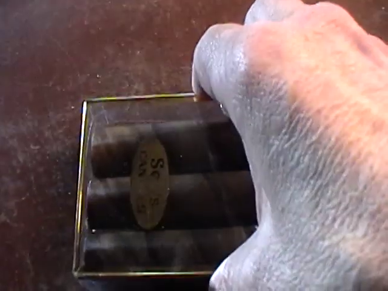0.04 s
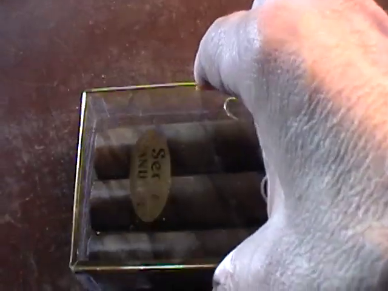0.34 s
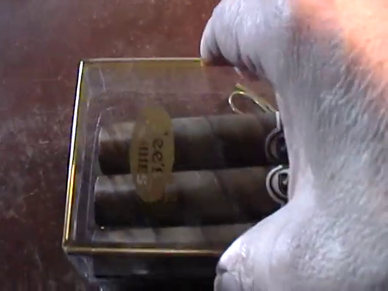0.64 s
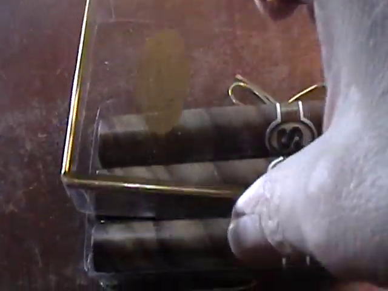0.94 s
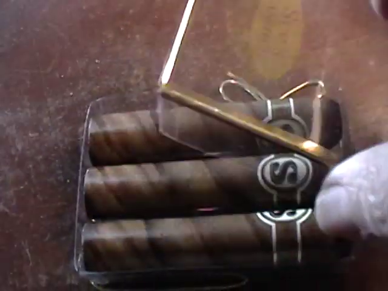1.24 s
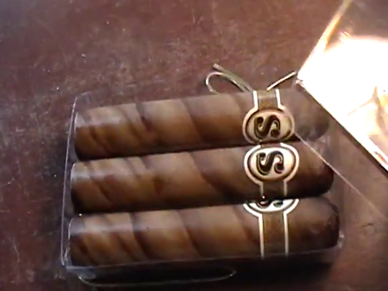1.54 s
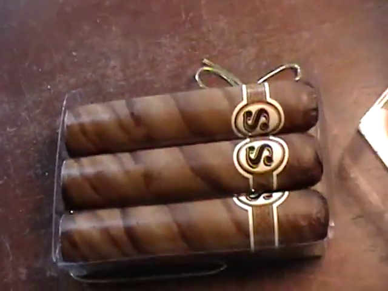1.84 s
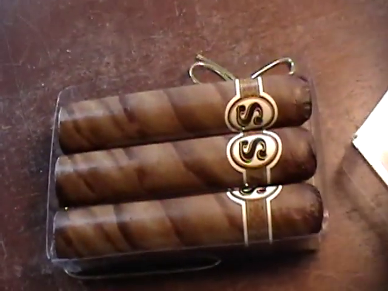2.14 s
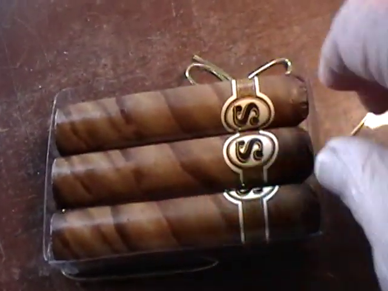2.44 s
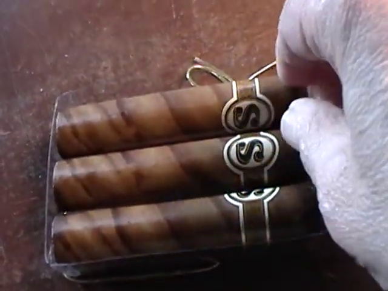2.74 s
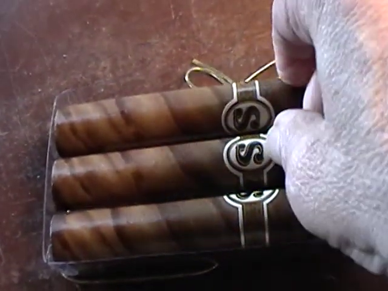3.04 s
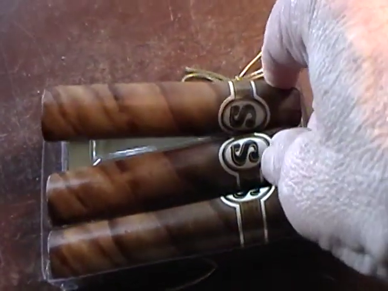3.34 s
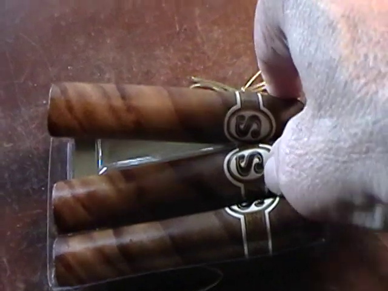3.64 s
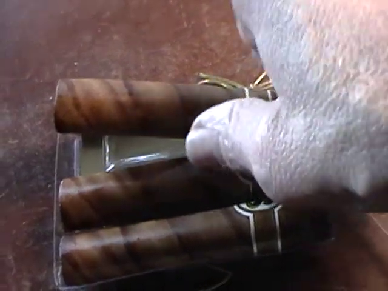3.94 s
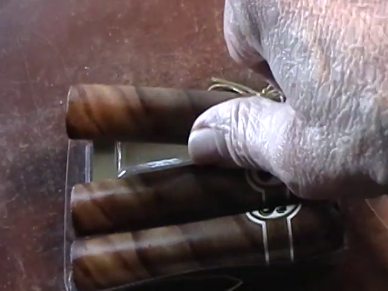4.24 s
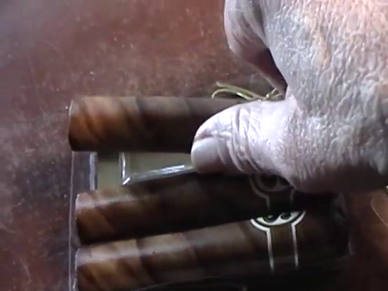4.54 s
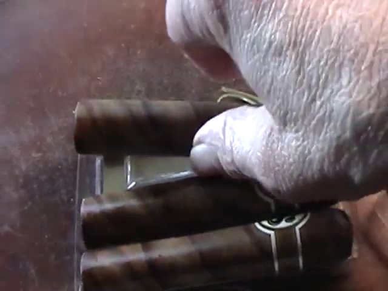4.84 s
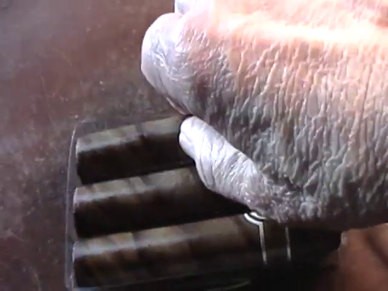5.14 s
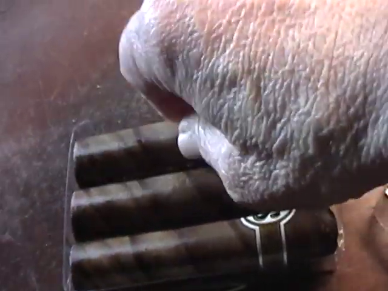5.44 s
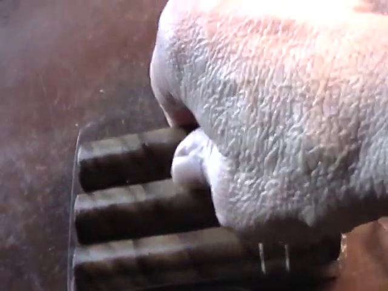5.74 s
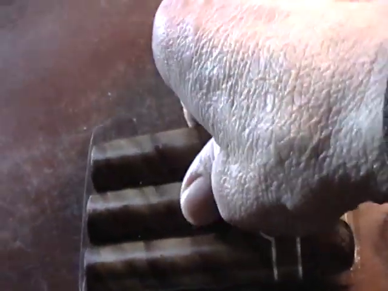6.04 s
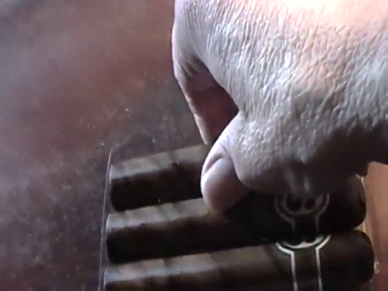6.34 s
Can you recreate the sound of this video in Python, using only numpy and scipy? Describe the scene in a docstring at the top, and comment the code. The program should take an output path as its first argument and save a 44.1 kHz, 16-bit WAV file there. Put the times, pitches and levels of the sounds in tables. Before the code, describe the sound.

A stiff plastic lid rubs and clicks as a hand works it off a small box. After a short pause it clatters onto a wooden table, rings briefly and skids. Fingers then pry at a cigar in a thin plastic tray and press it back, making clusters of sharp crackles, creaks, scrapes and light thumps. The microphone is close, in a small quiet room with faint hum, hiss and camera whir.

```python
"""Opening a plastic gift box

A hand snaps the clear lid off and lays it on a wooden table, where it clatters, rings and slides.
Fingers prise a cigar out of the thin moulded tray and press it back: the plastic buckles, creaks
and thumps the table, and the wrapper rubs along it in tiny slips. Heard from close by on a
camera's stereo microphone in a small quiet room, over faint hum, hiss and the camera's own whir."""
import sys
import numpy as np
from scipy import signal
from scipy.fft import rfft, irfft
from scipy.io import wavfile

SR = 44100
rng = np.random.default_rng(int(sys.argv[2]) if len(sys.argv) > 2 else 0)


def to_wav(sig):
    """Store sig (one row per channel, or 1-D mono) as 16-bit WAV at the path in sys.argv[1].

    Samples outside -1..1 are clipped; the rate is SR.
    """
    pcm = np.clip(np.atleast_2d(sig), -1, 1) * 32767
    pcm = np.round(pcm).astype(np.int16)
    wavfile.write(sys.argv[1], SR, pcm.T)  # frames by channels


N = 281358
TIME_S = np.arange(N) / SR
BIN_HZ = np.arange(N // 2 + 1) * SR / N
SIDES = np.array([[1], [-1]])  # left, right


def from_db(db):
    """Decibels to gain."""
    return 10 ** (np.asarray(db) / 20)


def rms_one(x):
    """Scale to unit rms."""
    return x / np.sqrt(np.mean(x ** 2) + 1e-20)


def spectrum(points):
    """Spread (hz, value) points over the FFT bins along a log-frequency axis."""
    hz, values = np.transpose(points)
    return np.interp(np.log(BIN_HZ + 1), np.log(hz), values)


def band(x, low_hz, high_hz, order):
    """Causal band-pass."""
    return signal.sosfilt(signal.butter(order, [low_hz, high_hz], "band", fs=SR, output="sos"), x + 1e-18)


def resonate(x, hz, width_hz):
    """One resonance with gain 1 at its peak."""
    radius = np.exp(-np.pi * width_hz / SR)
    feedback = [1, -2 * radius * np.cos(2 * np.pi * hz / SR), radius ** 2]
    return signal.lfilter(np.array([1, 0, -1]) * (1 - radius ** 2) / 2, feedback, x + 1e-18)


def add(out, start_s, sound):
    """Mix a sound in at a time."""
    i = max(0, round(start_s * SR))
    out[i:i + len(sound)] += sound[:max(0, N - i)]


# Room noise and microphone hiss: frequency_hz, density_db
NOISE_FLOOR = [(18, -51), (30, -23), (184, -5), (473, -14), (740, -18), (1280, -22.5), (1390, -17),
               (5900, -27.5), (6550, -35.5), (11000, -36), (16000, -49)]
# The camera's hum and whir at its own microphone: pitch_hz, width_hz, level_db
CAMERA_BANDS = [(53, 32, -62.5), (122.9, 6.3, -61.5), (183.6, 37, -61), (283, 30, -64), (1450, 1200, -70),
                (3580, 380, -60.5), (4740, 630, -59), (5920, 64, -72)]
# The background swells and sinks: time_s, room_gain_db, whir_gain_db
BACKGROUND_SWELL = [(0, 3, 0), (.75, 0, 2), (.95, -1, -2.5), (1.85, 3, 1.5), (2.53, 0.5, -1.5),
                    (2.64, -.5, -11), (2.83, 0, -6), (2.95, 2.5, -2), (4.25, -2, -2), (4.52, 0, 4),
                    (5.8, -1.5, 0.5), (6.38, 1, 3.5)]

def background(floor_db=-56, stereo_width=0.33, left_db=1.6, throb_hz=59.8, throb_depth=0.29):
    """Room noise and hum, stronger on the left, and the camera's drive whirring with one pulse a turn."""
    white = rng.standard_normal((2, N))
    mid, side = rms_one(irfft(rfft(white) * from_db(spectrum(NOISE_FLOOR)), N))
    hum, whir = 0, 0
    for hz, width_hz, db in CAMERA_BANDS:
        narrow = resonate(rng.standard_normal(N), hz, 2 * width_hz)
        tone = from_db(db) * rms_one(resonate(narrow, hz, 2 * width_hz))
        if hz < 1000:
            hum += tone
        else:
            whir += tone
    whir *= 1 + throb_depth * np.sin(2 * np.pi * throb_hz * TIME_S)
    air = from_db(floor_db) * (mid + stereo_width * side * SIDES) + hum
    times, room_db, whir_db = np.transpose(BACKGROUND_SWELL)
    air *= from_db(np.interp(TIME_S, times, room_db) + left_db * SIDES)
    return air + whir * from_db(np.interp(TIME_S, times, whir_db))


# Resonances of the thin plastic shell: pitch_hz, width_hz, gain_db
SHELL_MODES = [(696, 38, -5.5), (1455, 100, -1.5), (1790, 560, -2), (2580, 200, -18), (2990, 235, -5.5),
               (3626, 190, -5.5), (4164, 490, -0.5), (4950, 480, -7), (5846, 120, 4.5), (6600, 260, -4.5),
               (8930, 610, -15)]
# Its four registers, hollow, body, snap and edge: low_hz, high_hz
SHELL_REGISTERS = [(500, 1164), (1300, 2680), (3100, 5370), (6500, 11200)]

def shell(force, level_db, hollow_db, body_db, edge_db, direct, detune, spread_db):
    """Each contact rings the shell differently. Hollow, body and edge are relative to the snap register."""
    rung = direct * force
    for hz, width_hz, db in SHELL_MODES:
        bend, weight = rng.standard_normal(2)
        rung += from_db(db + spread_db * weight) * resonate(force, hz * (1 + detune * bend), width_hz)
    out = 0
    orders = [2, 3, 3, 2]  # the outer registers roll off more gently
    for (low_hz, high_hz), db, order in zip(SHELL_REGISTERS, [hollow_db, body_db, 0, edge_db], orders):
        register = band(rung, low_hz, high_hz, order)
        out += from_db(level_db + db) * register / np.sqrt(np.sum(register ** 2))
    return out


# Lid and wrapper slide on plastic or wood, close up: start_s, end_s, level_db, hollow_db, edge_db
SLIDES = [(0, 0.468, -53.5, -4, -15), (0.486, 0.574, -49.5, 1, -11), (0.621, 0.738, -41.5, -10, -13.5),
          (0.651, 0.714, -38, -12, -30), (0.771, 0.833, -61, -28, -13), (1.686, 1.754, -28, -14, -14.5),
          (1.774, 1.847, -38.5, -7.5, -15.5), (1.934, 2.022, -46.5, 1, -16), (2.084, 2.115, -46, 6, -12.5),
          (2.198, 2.219, -50.5, -5, -28), (2.27, 2.285, -45.5, -28, -21), (2.979, 3.214, -56, -16, -13),
          (3.191, 3.306, -47.5, -9, -15.5), (3.301, 3.428, -40, 2, -16), (3.317, 3.396, -35, 0.5, -13),
          (3.438, 3.518, -44.5, 5, -15), (3.733, 4.18, -56, -13, -11), (4.682, 4.863, -40.5, -14.5, -13),
          (4.845, 4.862, -31.5, 2, -3), (4.869, 4.933, -44, -11, -22), (4.931, 5.192, -44, -11.5, -13),
          (5.029, 5.17, -43.5, -7, -16), (5.326, 5.422, -47, -31, -10.5), (5.345, 5.38, -37.5, -39, -12.5),
          (5.513, 5.545, -40, -20, -4), (5.613, 5.69, -50.5, -10, -7.5), (5.728, 5.85, -45.5, -30, -9),
          (5.849, 5.875, -38.5, -32, -6.5), (5.926, 6.16, -53, -16, -13), (6.258, 6.361, -47.5, -12, -11.5)]

def slides(slips_per_s=2200, size_db=2.5, grip_db=3, rise_share=0.062, fall_s=0.029, gain_db=-1.4):
    """Sliding is a dense run of tiny slips whose force wavers with the grip; long strokes start gently."""
    out = np.zeros(N)
    for start_s, end_s, db, hollow_db, edge_db in SLIDES:
        length_s = end_s - start_s
        t = np.arange(int((length_s + 2 * fall_s) * SR)) / SR
        slips = (rng.random(len(t)) < slips_per_s / SR) * rng.choice([-1, 1], len(t))
        sizes = from_db(size_db * np.minimum(rng.exponential(1, len(t)), 4))
        grip = np.interp(t * 110, np.arange(100), rng.standard_normal(100))  # 110 changes a second
        rise = np.clip(t / (rise_share * length_s), 0, 1)
        fall = np.clip((length_s - t) / fall_s + 0.5, 0, 1)
        force = slips * sizes * rise * fall * from_db(grip_db * grip)
        force = band(force, 86, 7200, order=1)  # a slip is softer than a snap
        body_db = 1.5 + 0.56 * hollow_db  # a light, thin stroke has less body
        rub = shell(force, db, hollow_db, body_db, edge_db, direct=0.38, detune=0.072, spread_db=3)
        add(out, start_s, rub * np.sqrt(length_s * SR))
    return from_db(gain_db) * out


def cracks(rows, flutter, creep_share, echo, echo_s, direct, body_db=3, body_follows=0.63):
    """The sheet creeps, jumps, flutters for a few milliseconds and echoes off hand and table."""
    out, jump = np.zeros(N), SR // 128
    t = (np.arange(SR // 16) - jump) / SR
    for start_s, db, hollow_db, edge_db, t60_s in rows:
        fade = np.where(t < 0, -t / creep_share, t) / t60_s  # creep builds faster than flutter dies
        force = flutter * rng.standard_normal(len(t)) * from_db(-60 * fade)
        force[jump] += 1
        lag = int(echo_s * SR * rng.uniform(0.575, 1.3)) + 1
        force[lag:] += echo * force[:-lag]
        full_body_db = body_db + body_follows * hollow_db  # a hollower crack has more body
        crack = shell(force, db, hollow_db, full_body_db, edge_db, direct, detune=0.029, spread_db=2.5)
        add(out, start_s + t[0], crack * np.sqrt(SR / 100))
    return out


# The plastic snaps close to the microphone, first the lid, then the tray:
# start_s, level_db, hollow_db, edge_db, t60_s
PLASTIC_SNAPS = [(0.031, -45.5, -36, -6, 0.017), (0.1631, -44, -13, -9, 0.028),
                 (0.2325, -46.5, 1.5, -15, 0.051), (0.3198, -35.5, -4, -13.5, 0.02),
                 (0.514, -28, -16, -17.5, 0.015), (0.566, -41, -29, -9, 0.014),
                 (0.6218, -39, -17, -12, 0.041), (0.771, -31.5, -16, -5, 0.018),
                 (2.2354, -51.5, -8, -26, .014), (2.8372, -51, -31, -17, 0.02),
                 (2.8634, -30.5, -24, -12, 0.0047), (2.9018, -33, -15, -6.5, 0.018),
                 (2.9293, -43.5, -28, -13, 0.0072), (2.9741, -37.5, -15, -13.5, 0.043),
                 (3.0438, -43, -37, -15, 0.014), (3.1125, -41.5, -45, -5.5, .005),
                 (3.1972, -40, -7, -12, 0.017), (3.26, -38.5, -21, -23, 0.0036), (3.3, -35, -9, -21, 0.043),
                 (3.3904, -28, -6, -10, 0.016), (3.3946, -27, -11, -10, .015), (3.4098, -33, -8, -10, .018),
                 (3.5068, -35.5, -12, -12, 0.061), (3.519, -40.5, -16, 2.5, 0.012),
                 (3.6857, -54.5, 6, -11, 0.0077), (3.829, -31, -17.5, -16, .011),
                 (3.9261, -40, -20, -12, 0.013), (4.018, -49.5, -4, -21, 0.079),
                 (4.1882, -36.5, -27, 0, 0.01), (4.386, -41.5, -30, -3.5, 0.0098),
                 (4.5666, -34, -13, -25, .007), (4.5952, -29.5, -16.5, -15.5, 0.044),
                 (4.6034, -36, -1, -19, 0.036), (4.6112, -35.5, -22, -6.5, 0.0073),
                 (4.842, -31, -10, -16, 0.078), (4.8507, -15, -26, -11.5, 0.016),
                 (4.858, -14.5, -18.5, -11.5, 0.015), (5.0878, -33.5, -11, -33, .03),
                 (5.1376, -35, -7.5, -16, 0.028), (5.1676, -22.5, -13.5, -16, .04),
                 (5.178, -22, -5.5, -14, 0.032), (5.375, -32.5, -33, -26, 0.03),
                 (5.485, -34, -14, -11.5, 0.046), (5.495, -33.5, -25, -25, 0.014),
                 (5.5391, -18.5, -26, -22.5, 0.013), (5.5608, -35, -26, -10, 0.0051),
                 (5.6146, -21.5, -21.5, -20, 0.027), (5.6168, -26.5, -16, -11, 0.037),
                 (6.0279, -34.5, -19.5, -9, 0.0097), (6.1651, -35.5, -21, -11, 0.008),
                 (6.1712, -31, -17.5, -7, 0.0091), (6.2505, -25.5, -28, -22.5, 0.0065)]

def plastic_snaps(gain_db=0.5):
    """The thin plastic buckles under the fingers."""
    snaps = cracks(PLASTIC_SNAPS, flutter=0.15, creep_share=0.36, echo=0.44, echo_s=0.0025, direct=0.32)
    return from_db(gain_db) * snaps


def slide_ticks(ticks_per_s=7.4, tick_db=-46, firm_stroke_db=-40, follows=0.35, spread_db=1.5, t60_s=0.0081):
    """A slide catches at random with small snaps that follow its level and colour."""
    rows = []
    for start_s, end_s, db, hollow_db, edge_db in SLIDES:
        times = start_s + np.cumsum(rng.exponential(1, size=8)) / ticks_per_s
        levels_db = tick_db + follows * (db - firm_stroke_db) + spread_db * rng.standard_normal(8)
        rows += [(s, level, hollow_db, edge_db + 1, t60_s) for s, level in zip(times, levels_db) if s < end_s]
    return cracks(rows, flutter=0.16, creep_share=0.56, echo=1, echo_s=0.0012, direct=0.47)


# Groans and rasps of dragged parts, and a low handling rumble: start_s, end_s, pitch_hz, level_db
GROANS_AND_RUMBLE = [(0.622, 0.743, 1406, -44), (1.766, 1.85, 5000, -41.5), (2.069, 2.132, 1033, -39),
                     (3.275, 3.54, 180, -46.5), (3.296, 3.522, 618, -47), (4.592, 4.7, 148, -44),
                     (4.676, 4.845, 2450, -45), (4.673, 4.861, 3930, -39.5), (4.976, 5.118, 286, -43),
                     (5.32, 5.477, 4300, -48.5), (5.445, 5.948, 54.5, -55)]

def groans_and_rumble():
    """Dragged parts judder and handling rumbles, each a narrow band of noise that swells and fades."""
    out = np.zeros(N)
    for start_s, end_s, hz, db in GROANS_AND_RUMBLE:
        width_hz = 33 + 0.11 * hz
        swell = np.sqrt(np.hanning(int((end_s - start_s) * SR)))
        narrow = resonate(rng.standard_normal(SR), hz, width_hz)
        tone = resonate(narrow, hz, width_hz)[-len(swell):]
        add(out, start_s, from_db(db) * rms_one(tone) * swell)
    return out


def strike(times_s, levels_db, modes, spread_db):
    """Blows on one body; each sets every mode ringing with a strength of its own."""
    out = np.zeros(N)
    scatter_db = spread_db * rng.standard_normal((len(times_s), len(modes)))
    for k, (hz, db, t60_s) in enumerate(modes):
        blows = np.zeros(N)
        blows[np.round(times_s * SR).astype(int)] = from_db(levels_db + db + scatter_db[:, k])
        radius, angle = from_db(-60 / (t60_s * SR)), 2 * np.pi * hz / SR
        feedback = [1, -2 * radius * np.cos(angle), radius ** 2]
        out += (-1) ** k * signal.lfilter([0, np.sin(angle)], feedback, blows + 1e-18)
    return out


def sympathy(shaking, modes):
    """A body hums along with whatever shakes it."""
    return sum((-1) ** k * from_db(db) * resonate(shaking, hz, np.log(1000) / (np.pi * t60_s))
               for k, (hz, db, t60_s) in enumerate(modes))


# The lid springs off the box, then lands on the table by the microphone: start_s, level_db, hollow_db
LID_KNOCKS = [(0.773, -24, -37), (1.6808, -24, -16), (1.6984, -24, -28), (1.7103, -32, -12),
              (1.7214, -45, -18), (1.7294, -30.5, -12), (1.737, -21.5, -11), (1.7414, -22, -4),
              (1.7691, -26, 2.5), (1.926, -25.5, -5.5), (1.9527, -32.5, -2), (1.9792, -31, 3)]
# Modes of the loose lid: pitch_hz, gain_db, t60_s
LID_RESONANCES = [(536, -4, 0.072), (763, 5.5, 0.11), (966, 3, 0.092), (1060, 0, .1), (1250, -5, 0.29),
                  (1403, 5, 0.029), (1630, -2, 0.015), (1894, 6.5, 0.035), (2990, -37, 0.08),
                  (3280, 3.5, 0.029), (5200, -17, 0.045)]

def lid_clatter(slide, edge_db=-20.5, t60_s=0.022, body_db=4, body_follows=0.26, ring_db=-10, skid_db=7):
    """The lid knocks, rings as strongly as its body was hit, and sings as it skids over the table."""
    rows = [(*knock, edge_db, t60_s) for knock in LID_KNOCKS]
    knocks = cracks(rows, flutter=0.13, creep_share=0.17, echo=0.32, echo_s=0.0039, direct=0.68,
                    body_db=body_db, body_follows=body_follows)
    times_s, db, hollow_db = np.transpose(LID_KNOCKS)
    full_body_db = body_db + body_follows * hollow_db
    ring = strike(times_s, db + (hollow_db + full_body_db) / 2 + ring_db, LID_RESONANCES, spread_db=3)
    skidding = (TIME_S > 1.6) & (TIME_S < 2.18)
    return knocks + ring + from_db(skid_db) * sympathy(slide * skidding, LID_RESONANCES)


# The tray bumps the wooden table, close up: start_s, level_db
TRAY_BUMPS = [(1.743, -25), (1.767, -30), (1.928, -31), (3.389, -31.5), (4.598, -26.5), (4.853, -21),
              (5.177, -23), (5.539, -25.5), (5.616, -34)]
# Modes of table and tray together: pitch_hz, gain_db, t60_s
TABLE_RESONANCES = [(97, -21.5, 0.27), (135, -22.5, 0.31), (172.6, -17, 0.11), (248, -5, 0.026),
                    (282.5, -9, 0.14), (339, -1, 0.034), (412, -1.5, 0.014)]

def table_thumps(slide, hum_db=6.5):
    """The table thuds under the tray and hums along with every slide."""
    times_s, db = np.transpose(TRAY_BUMPS)
    thumps = strike(times_s, db, TABLE_RESONANCES, spread_db=1)
    return thumps + from_db(hum_db) * sympathy(slide, TABLE_RESONANCES)


# High squeaks, faint even this close: start_s, start_pitch_hz
HIGH_SQUEAKS = [(3.585, 8050), (3.635, 7500), (3.83, 7550), (3.925, 7500)]

def squeaks(length_s=0.048, level_db=-71, sag_hz_per_s=4600):
    """Each squeak is a thin tone that swells, sags and fades."""
    out, t = np.zeros(N), np.arange(int(length_s * SR)) / SR
    for start_s, hz in HIGH_SQUEAKS:
        phase = 2 * np.pi * np.cumsum(hz - sag_hz_per_s * t) / SR
        add(out, start_s, from_db(level_db) * np.hanning(len(t)) * np.sin(phase))
    return out


def crispness(x, lid_db, tray_db, tray_from_s=2.5):
    """The highest treble is weak while the hands work the stiff lid, strong once they reach the tray."""
    gain = from_db(np.where(TIME_S < tray_from_s, lid_db, tray_db))
    return x + (gain - 1) * band(x, 12800, 14200, order=1)


def room(x, t60_s=0.23, level_db=-18.5, build_s=0.00057, stereo_width=0.17):
    """The small room returns a faint diffuse tail, much the same on both sides of the microphone."""
    t = np.arange(SR // 2) / SR
    envelope = from_db(-60 * t / t60_s) * np.clip(t / build_s, 0, 1)
    mid, side = band(rng.standard_normal((2, len(t))), 100, 7000, order=1) * envelope
    tail = (mid + stereo_width * side * SIDES) / np.sqrt(np.sum(mid ** 2))
    return from_db(level_db) * signal.fftconvolve(x[None], tail, axes=1)[:, :N]


def scene():
    """Box, lid and table close to the microphone, with the quiet room behind them."""
    air = background()
    slide = slides()
    plastic = plastic_snaps() + slide_ticks() + lid_clatter(slide)
    close = crispness(plastic, lid_db=-17, tray_db=3.5) + crispness(slide, lid_db=-5, tray_db=9.5)
    close += groans_and_rumble() + table_thumps(slide) + squeaks()
    return close + room(close) + air


# Balance of the microphone's two ports: frequency_hz, left_minus_right_db
MIC_BALANCE = [(60, 2.5), (130, 2.3), (250, 2), (600, .7), (2000, .7), (4200, .8), (6200, 1.2), (7600, 4.5),
               (9000, 3.5), (11000, -5), (15000, -7)]
# Phase between the ports: frequency_hz, left_lead_rad
MIC_PHASE = [(60, -.15), (300, -.42), (700, -.22), (2000, -.12), (5500, .14), (6900, .3), (7600, .9),
             (8500, -.9), (11000, -1.3), (12500, -1), (15800, .1)]

def record(dry, low_cut_hz=42, high_cut_hz=16400, ceiling=0.9):
    """The two ports colour the sound differently; peaks are rounded, the deep bass and the top are cut."""
    half = SIDES / 2
    ports = from_db(half * spectrum(MIC_BALANCE)) * np.exp(1j * half * spectrum(MIC_PHASE))
    heard = irfft(rfft(dry) * ports, N)
    heard = signal.sosfilt(signal.butter(4, low_cut_hz, "high", fs=SR, output="sos"), heard)
    rounded = heard / (1 + (heard / ceiling) ** 4) ** (1 / 4)
    return signal.sosfilt(signal.ellip(12, 0.1, 110, high_cut_hz, fs=SR, output="sos"), rounded)


dry = scene()
out = record(dry)
to_wav(out)
```